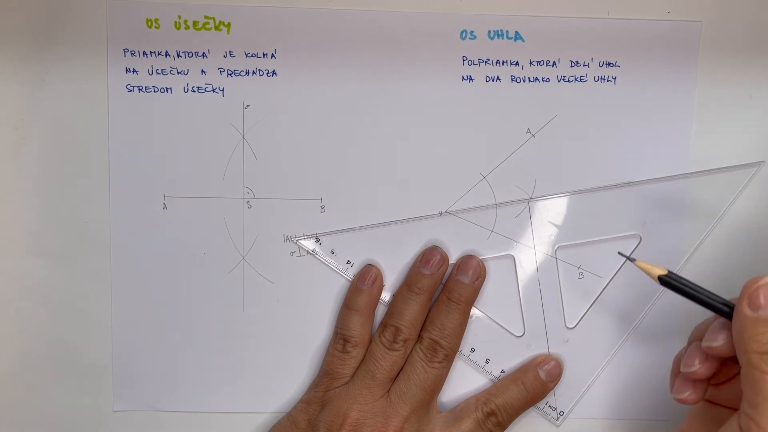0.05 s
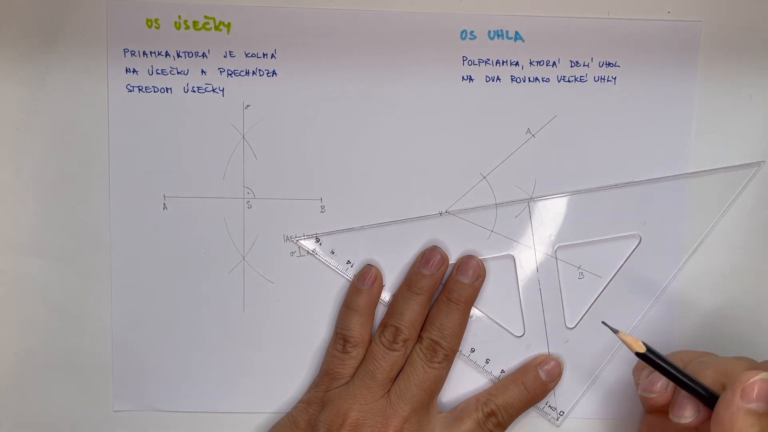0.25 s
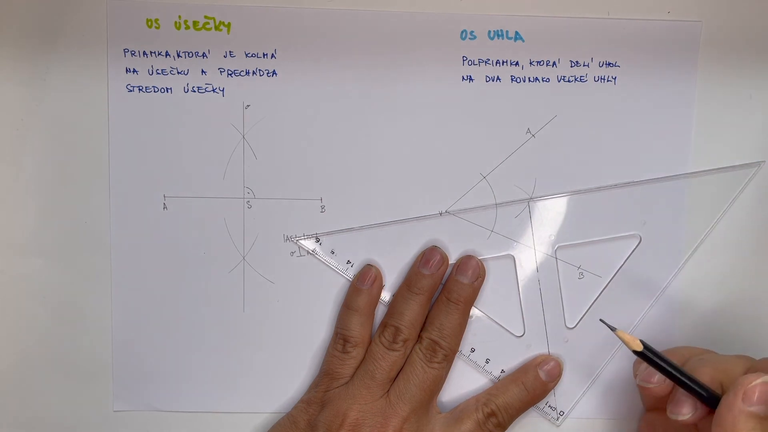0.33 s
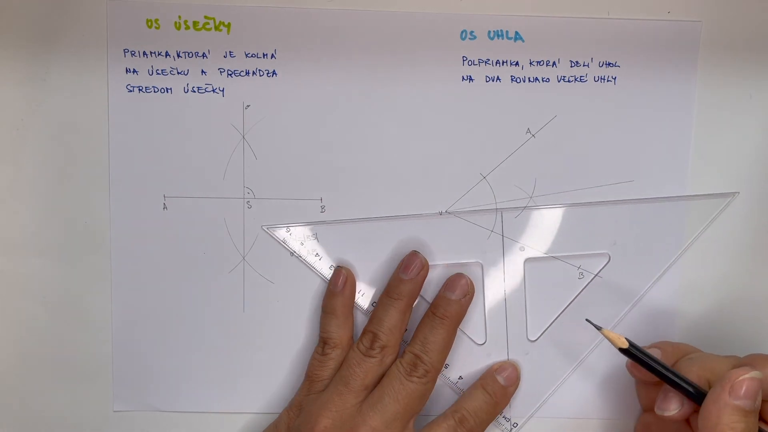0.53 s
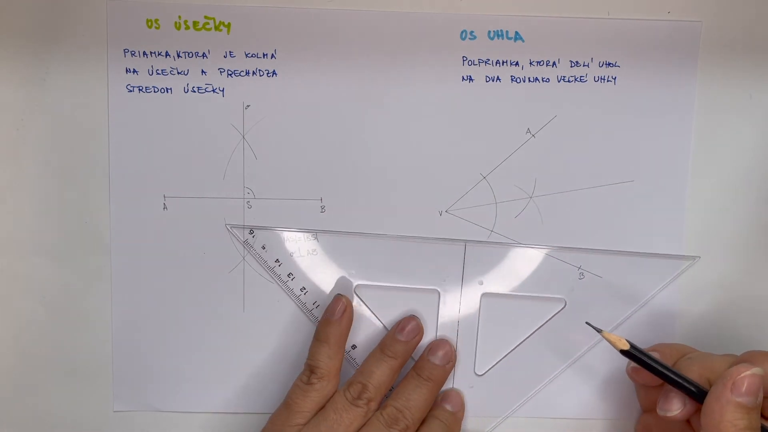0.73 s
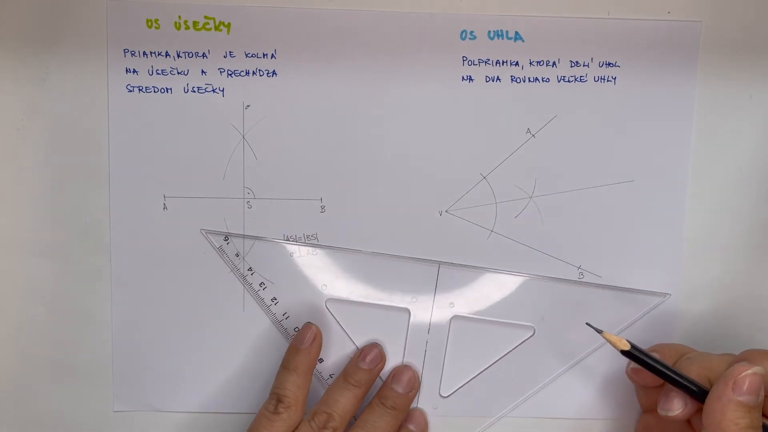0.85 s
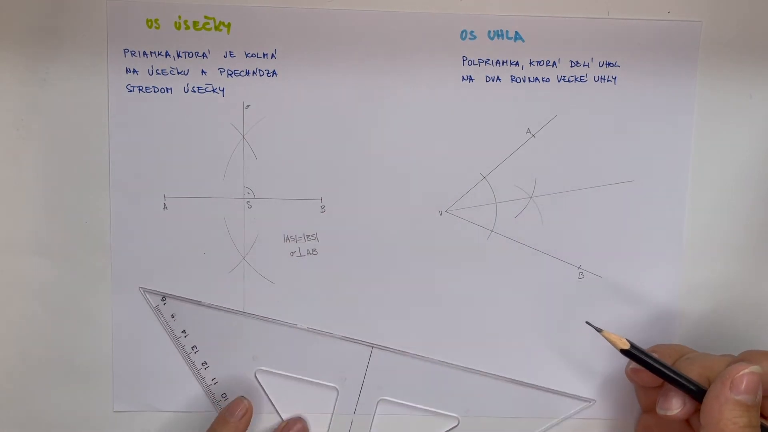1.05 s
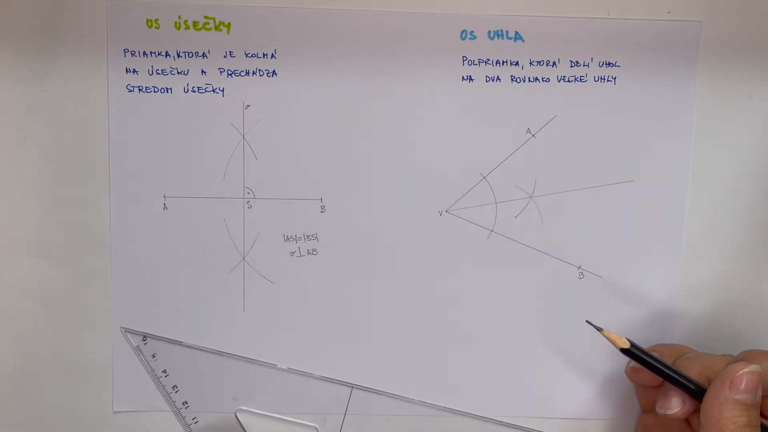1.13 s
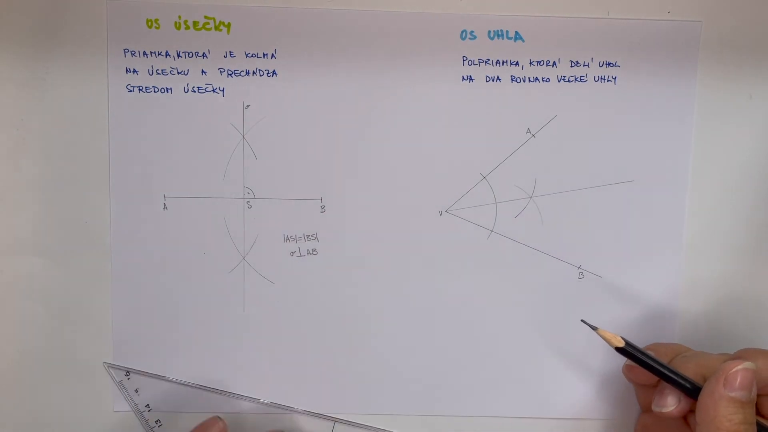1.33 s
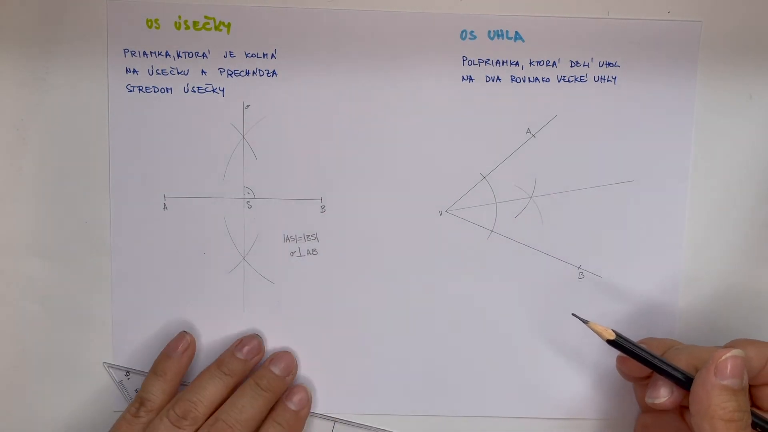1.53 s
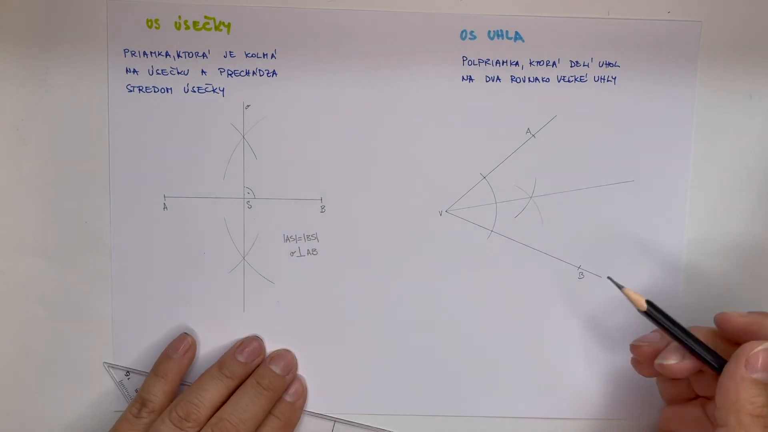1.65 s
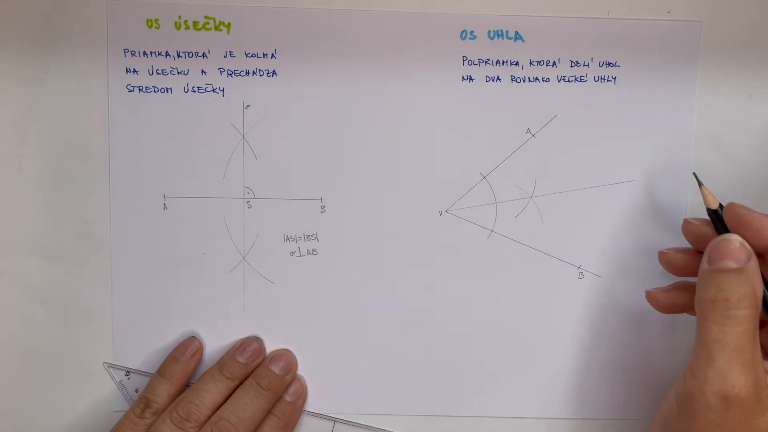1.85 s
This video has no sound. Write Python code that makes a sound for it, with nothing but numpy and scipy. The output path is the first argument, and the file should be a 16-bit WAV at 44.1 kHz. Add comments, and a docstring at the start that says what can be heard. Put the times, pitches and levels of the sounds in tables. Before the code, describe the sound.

A plastic set square slides over paper on a desk. It clacks lightly as a hand thumps down, hisses along in two pushes, then stops before another soft thump and a few ticks, close up in a quiet room.

```python
"""A plastic set square on a sheet of paper, on a desk in a small quiet room, close to the microphone.
First the fingers take hold: the plastic clacks lightly and the hand thumps the desk.
Then it slides down the sheet in two pushes, its edge hissing over the paper grain, and scuffs to rest.
Last the hand lands again with a thump, a faint squeak and a few more ticks.
Low room tone lies under it all; the two microphone ports hear the treble out of step."""
import sys
import numpy as np
from scipy import signal
from scipy.fft import rfft, irfft, next_fast_len
from scipy.io import wavfile

SR = 44100
rng = np.random.default_rng(int(sys.argv[2]) if len(sys.argv) > 2 else 0)


def to_wav(s):
    """Save 16-bit WAV."""
    ch = np.atleast_2d(s).T  # columns
    pcm = np.round(np.clip(ch, -1, 1) * 32767)  # PCM
    wavfile.write(sys.argv[1], SR, pcm.astype(np.int16))


N = 83790
TIME = np.arange(N) / SR

# the two pushes down the sheet: time_s, hiss_db, scrape_db
SLIDE = [(.30, -71, -73.5), (.335, -55, -59.5), (.46, -43, -54), (.60, -43.5, -54), (.69, -44.5, -57.5),
         (.745, -48.5, -60), (.80, -40.5, -54.5), (.92, -37, -53.5), (1.06, -38, -55.5), (1.13, -41, -58.5),
         (1.17, -47, -61.5), (1.205, -59.5, -68), (1.25, -113, -109)]
# light contacts of the plastic: start_s, body_db, clack_db, ping_db, tick_db
CONTACTS = [(0.1678, -39.5, -49.5, -57, -67), (0.1686, -38, -60, -60, -56.5),
            (0.1961, -46.5, -61, -64, -46), (0.203, -42, -63, -56, -51), (0.2337, -56, -71, -62, -48),
            (.2500, -42.5, -51, -48, -48.5), (0.2821, -40, -49, -70, -58), (0.2843, -54, -48.5, -80, -52),
            (.325, -48, -55, -59, -51), (0.366, -54, -60, -47, -44.5), (0.5347, -64, -62, -56, -41),
            (0.5383, -42, -41, -44, -37.5), (0.642, -69, -54, -45, -44), (.674, -77, -59, -58, -40.5),
            (0.709, -63, -52, -60, -45), (1.072, -68, -55, -44, -40.5), (1.3812, -84, -60.5, -43.5, -53),
            (1.5178, -55, -63, -48.5, -40), (1.542, -68, -58, -60, -51), (1.5626, -67, -65, -42, -39.5),
            (1.5723, -54, -62, -66, -38), (1.7392, -67, -67, -44.5, -48), (1.889, -50, -51.5, -42, -44)]


def rub(stroke):
    """The plastic catches on paper fibres: tiny snaps in a hiss and a lower scrape, juddering slightly."""
    # spectra of the hiss and the scrape: frequency_hz, density_db
    hiss_colour = [(2000, -44), (5000, -12.5), (7000, -13), (8200, -6), (9400, -2), (10700, 5),
                   (11600, -6.5), (12800, -26), (14200, -75), (15700, -44)]
    scrape_colour = [(150, -4), (400, -30), (800, -7.5), (1400, -3), (1950, -1.5), (2400, 5), (3100, 8),
                     (4200, 5.5), (5200, 4.5), (7000, 4.5), (11000, -43)]
    snaps_per_s, snap_spread_db, snap_share = 2500, 0.5, 0.3
    judder = amp(1.1 * wander(hz=86.5))
    snaps = np.sign(noise()) * amp(snap_spread_db * np.minimum(rng.exponential(1, N), 4))
    snaps *= rng.random(N) < snaps_per_s / SR
    grain = np.sqrt(snap_share) * unit(snaps)
    hiss_drive, scrape_drive = [(grain + np.sqrt(1 - snap_share) * noise()) * judder for _ in range(2)]
    pressure = amp(1.33 * wander(hz=21.5))
    scrape_gain = level(stroke, column=2) * pressure
    hiss = colour(hiss_drive * level(stroke), hiss_colour)
    middle = hiss + colour(scrape_drive * scrape_gain, scrape_colour)
    # the long edge spreads the scrape between the ports
    side = 0.31 * colour(noise() * scrape_gain, scrape_colour)
    return np.array([middle + side, middle - side])


def strokes():
    """The set square rubs the paper as it is gripped, as it slides and as the hand settles on it."""
    # friction before and after the slide: time_s, hiss_db, scrape_db
    grip = [(.16, -63.5, -67), (.185, -60, -59.5), (.203, -69, -68), (.22, -73.5, -73), (.245, -62, -65.5),
            (.275, -75, -80), (.30, -74, -85)]
    settle = [(1.51, -95, -73), (1.545, -57, -76), (1.59, -63, -75), (1.62, -65.5, -79), (1.68, -76, -89),
              (1.73, -93, -100)]
    return rub(grip) + rub(SLIDE) + rub(settle)


def fizz():
    """The highest treble, which grows steeply with the speed of the slide."""
    # spectrum of the fizz: frequency_hz, density_db
    fizz_colour = [(8000, -47), (11500, 16), (13000, 5), (14200, -6), (15600, 0)]
    speed = level(SLIDE)  # the hiss level stands for speed
    return amp(-46.5) * colour(noise() * (speed / speed.max()) ** 4.4, fizz_colour)


def contacts():
    """Each contact rings the plastic's body and stiff edge, with a dry clack and a fine tick."""
    # modes of the body and the edge: pitch_hz, level_db, t60_s
    body_modes = [(1200, -10.5, 0.016), (1360, -1, 0.012), (1670, -6.5, 0.0063), (2260, -4, 0.0048),
                  (2915, -3.5, 0.012), (3350, -10.5, .007), (4330, -10, 0.0077), (6500, -13, 0.0098)]
    edge_modes = [(4300, -11, 0.01), (4600, -3, 0.011), (5220, -4.5, 0.012), (6340, -6, 0.0098),
                  (10950, -9, 0.018)]
    # clack of the face and tick of the edge: frequency_hz, density_db
    clack_colour = [(700, -15.5), (1600, 11), (2300, 5.5), (3100, 7.5), (3900, 5), (5000, -10.5),
                    (10000, -41.5)]
    tick_colour = [(2500, -29), (4500, 3), (6000, -3.5), (8200, 11.5), (10500, 13), (12500, -28),
                   (15500, -25)]
    body = ring(body_modes, column=1) + rattle(clack_colour, column=2)
    edge = ring(edge_modes, column=3) + rattle(tick_colour, column=4)
    return body + edge


def ring(modes, column):
    """Each contact strikes the plastic's modes; their balance varies with the place of contact."""
    rise_s, place_spread_db = 0.00031, 4.1
    out = np.zeros(N)
    for contact in CONTACTS:
        start = contact[0]
        ringing = (TIME >= start) & (TIME < start + .1)
        t = TIME[ringing] - start
        attack = 1 - np.exp(-t / rise_s)
        for hz, mode_db, t60 in modes:
            struck_db = contact[column] + mode_db + place_spread_db * rng.standard_normal()
            out[ringing] += attack * amp(struck_db - 60 * t / t60) * np.sin(2 * np.pi * hz * t)
    return out


def rattle(spectrum, column):
    """One sharp snap at each contact, standing above a brief rattle with a faint tail."""
    snap_db, rattle_s, tail_s, tail_db = 13, 0.0013, 0.019, -19.5
    snaps, envelope = np.zeros((2, N))
    for contact in CONTACTS:
        start, db = contact[0], contact[column]
        snaps[round(start * SR)] += amp(db + snap_db)
        envelope += amp(db) * (fade(start, rattle_s) + amp(tail_db) * fade(start, tail_s))
    return colour(snaps + np.sign(noise()) * envelope, spectrum)


def thumps():
    """The hand's blows ring the desk, each up to its own cutoff, each with a thud and a slap."""
    # the hand meets the desk: start_s, level_db, cutoff_hz, thud_db, slap_db
    blows = [(0.205, -30.5, 167, -53, -67), (0.233, -38, 130, -74, -75), (0.251, -34.5, 110, -59, -74),
             (0.285, -52, 300, -42, -48.5), (.452, -48.5, 90, -75, -72), (0.643, -43.5, 101, -87, -66),
             (0.673, -49, 110, -81, -83), (0.7795, -42.5, 332, -47, -48), (1.049, -51, 171, -74, -62.5),
             (1.5234, -41, 208, -43.5, -49), (1.534, -31, 125, -51, -83), (1.552, -40.5, 130, -42, -58.5),
             (1.636, -32.5, 41.7, -66, -92)]
    # modes of the desk: pitch_hz, level_db, t60_s
    desk_modes = [(38.5, -11.5, 0.35), (107.3, 2.5, 0.14), (128.4, 5.5, 0.069), (188.6, 1.5, 0.11),
                  (206, -13, 0.067), (365, -10, 0.029), (515, -5, 0.018)]
    # dull thud and slap of the skin: frequency_hz, density_db
    thud_colour = [(30, 24.5), (90, -26), (170, 1.5), (250, 4), (340, -11), (540, -11.5), (750, -24),
                   (1500, -42.5)]
    slap_colour = [(150, -41), (300, 6), (420, 2.5), (580, -2.5), (720, -15), (1050, -9.5), (1800, -46)]
    rise_s = 0.0042
    desk, thud, slap = np.zeros((3, N))
    for start, db, cutoff_hz, thud_db, slap_db in blows:
        t = np.maximum(TIME - start, 0)
        push = amp(db) * (1 - np.exp(-t / rise_s))
        for hz, mode_db, t60 in desk_modes:
            decay = amp(mode_db - 60 * t / t60) / np.hypot(1, (hz / cutoff_hz) ** 2)
            desk += push * decay * np.sin(2 * np.pi * hz * t)
        thud += amp(thud_db) * fade(start, seconds=0.069)
        slap += amp(slap_db) * fade(start, seconds=0.011)
    return desk + colour(noise() * thud, thud_colour) + colour(noise() * slap, slap_colour)


def hand():
    """The moving hand rumbles the desk, brushes the paper, scuffs to rest and squeaks as it settles."""
    # course of each noise: time_s, level_db
    rumble = [(.18, -58.5), (.29, -53), (.38, -59.5), (.55, -62), (.72, -63), (.84, -48.5), (.98, -82),
              (1.08, -58), (1.2, -63.5), (1.3, -72)]
    brush = [(.27, -70), (.295, -66), (.37, -66.5), (.55, -62), (.66, -85), (1.0, -80), (1.11, -64),
             (1.2, -73), (1.3, -83), (1.42, -74)]
    scuff = [(1.05, -74), (1.115, -64.5), (1.15, -84), (1.177, -64.5), (1.225, -71), (1.29, -87),
             (1.345, -75.5), (1.39, -78)]
    squeak = [(1.42, -78), (1.47, -86), (1.55, -73.5), (1.64, -77), (1.72, -102), (1.78, -73)]
    # their spectra: frequency_hz, density_db
    rumble_colour = [(22, -18), (43, 4), (70, -9.5), (104, 3), (145, -8), (200, -3.5), (300, -15.5),
                     (550, -28), (1100, -58)]
    brush_colour = [(100, -2), (300, 6), (500, -3), (800, -7), (1300, 0), (2200, -11.5), (5000, -64)]
    scuff_colour = [(300, -22), (500, 8.5), (1100, 7), (1700, -11), (4000, -38)]
    squeak_colour = [(2000, -37), (2600, 3), (2780, 2), (2950, -23), (3600, -44)]
    layers = [(rumble, rumble_colour), (brush, brush_colour),
              (scuff, scuff_colour), (squeak, squeak_colour)]
    return sum(colour(noise() * level(curve), spectrum) for curve, spectrum in layers)


def room_echo(x):
    """The small room returns a short scattered echo, different at each port."""
    # tone of the echo: frequency_hz, gain_db
    echo_colour = [(40, -52), (120, -10), (400, -5.5), (1500, -6), (3000, -12), (6000, -8), (9000, -13.5),
                   (14000, -52)]
    t60_s, gap_s = 0.15, 0.002
    t = TIME[:SR // 3]
    tails = rng.standard_normal((2, len(t))) * amp(-60 * t / t60_s) * (t > gap_s)
    send = colour(x, echo_colour, keep_power=False)
    return np.array([signal.fftconvolve(send, tail / np.linalg.norm(tail))[:N] for tail in tails])


def room_tone():
    """Low steady air, alike at both ports in the bass."""
    # spectrum of the air: frequency_hz, density_db
    air_colour = [(20, -6), (45, 4), (75, 1.5), (110, -3), (190, -2.5), (300, -10), (600, -16), (1200, -24),
                  (2500, -29.5), (5000, -32), (9200, -24), (12000, -29.5), (13500, -53)]
    # how far it differs between the ports: frequency_hz, gain_db
    air_width = [(40, -20), (150, -11), (500, -5), (2000, -1), (7000, -8.5), (11000, -13.5)]
    side = colour(colour(noise(), air_colour), air_width, keep_power=False)
    return amp(-62) * (colour(noise(), air_colour) + np.array([side, -side]))


def amp(db):
    """Decibels to gain."""
    return 10 ** (np.asarray(db) / 20)


def unit(x):
    """Scales to rms 1."""
    return x / np.sqrt(np.mean(x ** 2) + 1e-20)


def read(points, hz):
    """Reads a table on a log-frequency axis."""
    f, value = np.transpose(points)
    return np.interp(np.log(hz + 1), np.log(f + 1), value)


def level(points, column=1):
    """Gain over time from one dB column of a curve; silent outside it."""
    rows = np.array(points)
    return amp(np.interp(TIME, rows[:, 0], rows[:, column], left=-120, right=-120))


def colour(x, points, keep_power=True):
    """Minimum-phase filter with the given spectrum; keep_power holds white noise at its level."""
    size = 8192
    gain = amp(read(points, abs(np.fft.fftfreq(size, 1 / SR))))
    response = np.exp(np.conj(signal.hilbert(np.log(gain))))
    taps = np.fft.ifft(response).real[:size // 2]
    return signal.fftconvolve(x, taps / np.linalg.norm(taps) if keep_power else taps)[:N]


def noise():
    """White noise for the whole scene."""
    return rng.standard_normal(N)


def fade(start, seconds):
    """A sudden start and an exponential decay."""
    return (TIME >= start) * np.exp(-np.maximum(TIME - start, 0) / seconds)


def wander(hz):
    """A random drift of rms 1, up to the given rate."""
    return unit(signal.sosfilt(signal.butter(2, hz, fs=SR, output="sos"), noise()))


def scene():
    """Hand, set square and desk up close, with the room behind them."""
    near = hand() + strokes() + fizz() + contacts() + thumps()
    return near + room_echo(near.mean(axis=0)) + room_tone()


def record(dry):
    """The microphone: two ports that differ in phase and level, a low cut and a band limit."""
    # left port against right: frequency_hz, phase_rad
    port_phase = [(0, 0), (1890, 0), (2900, .8), (4800, .85), (6600, .1), (7800, .7), (8800, -.1),
                  (10200, -3.14), (11800, -6.1), (12700, -6.5), (13600, -9.4), (15000, -12.5)]
    # left port against right: frequency_hz, level_db
    port_balance = [(30, 2), (70, 1.8), (380, 1.5), (1290, 3), (2400, 2.5), (5000, 3.5), (8100, 1.3),
                    (15000, -1.5)]
    low_cut_hz, high_cut_hz = 37.8, 15800
    size = next_fast_len(N + 4096)
    hz = np.fft.rfftfreq(size, 1 / SR)
    lean = amp(read(port_balance, hz) / 2)
    response = np.array([lean * np.exp(1j * read(port_phase, hz)), 1 / lean])
    low_cut = 1 - 1 / (1 + (hz / low_cut_hz) ** 14)
    ports = irfft(rfft(dry, size) * low_cut * response, size)[:, :N]
    band_limit = signal.firwin(511, high_cut_hz, window=("kaiser", 9), fs=SR)
    return signal.oaconvolve(ports, band_limit[None], "same")


dry = scene()
out = record(dry)
to_wav(out)
```